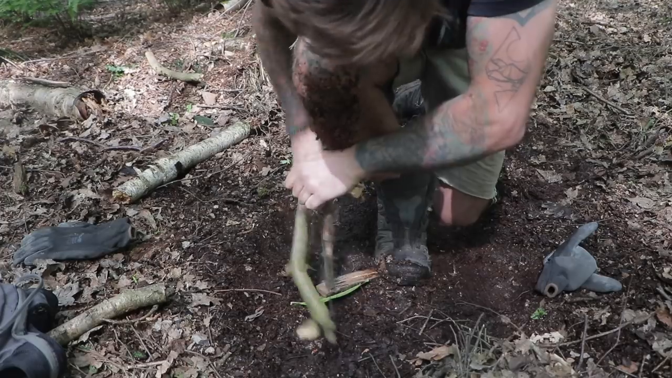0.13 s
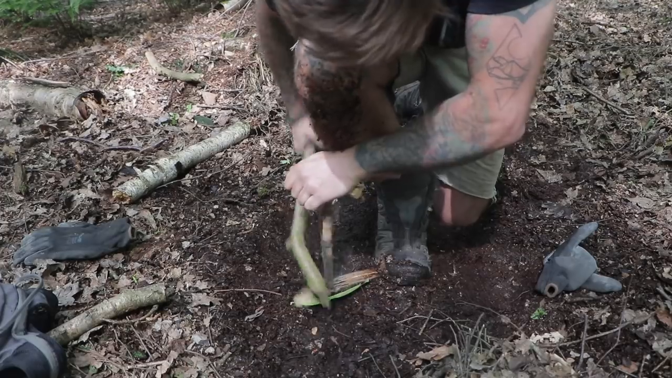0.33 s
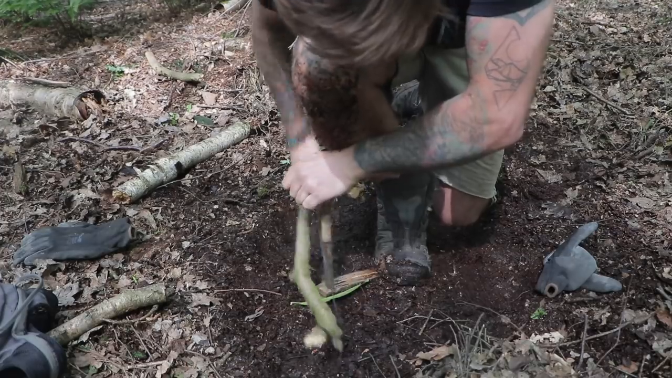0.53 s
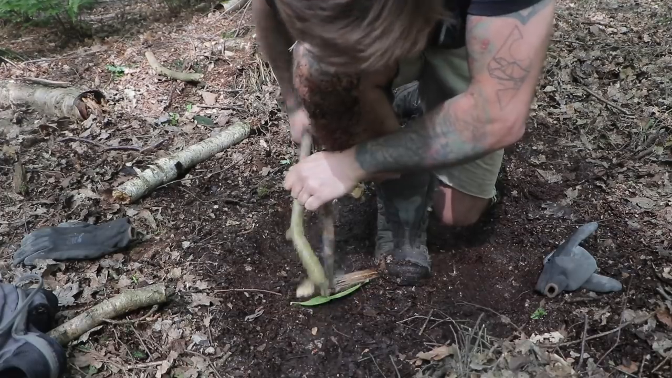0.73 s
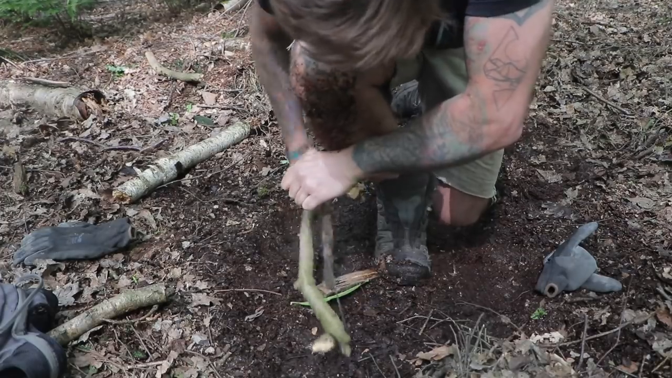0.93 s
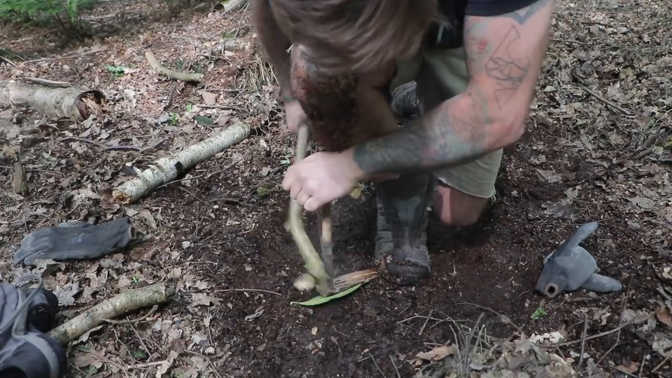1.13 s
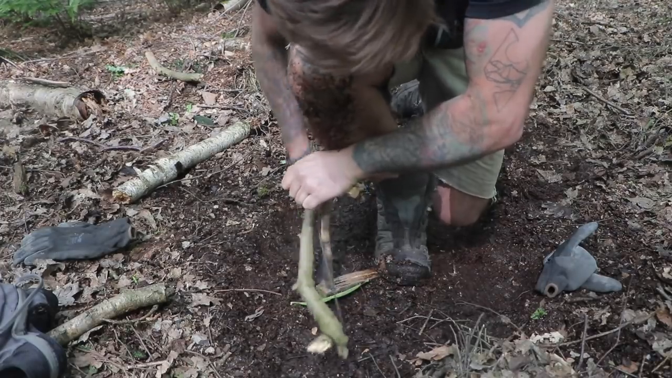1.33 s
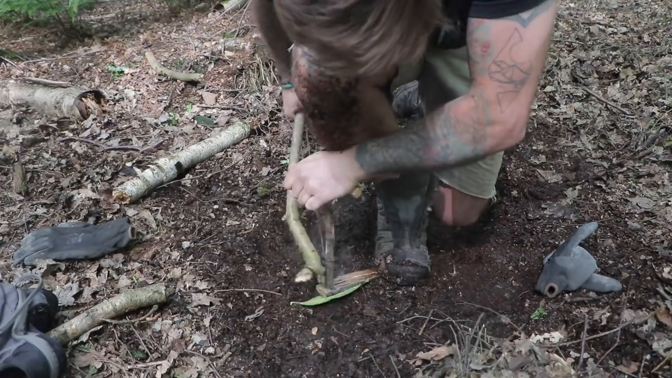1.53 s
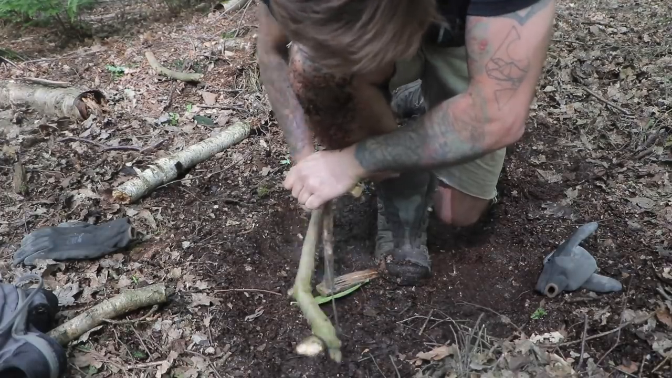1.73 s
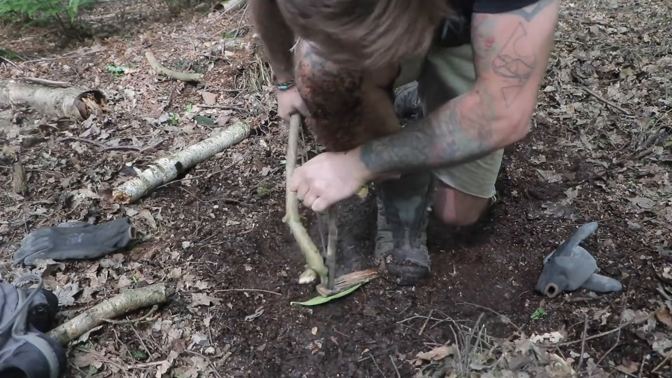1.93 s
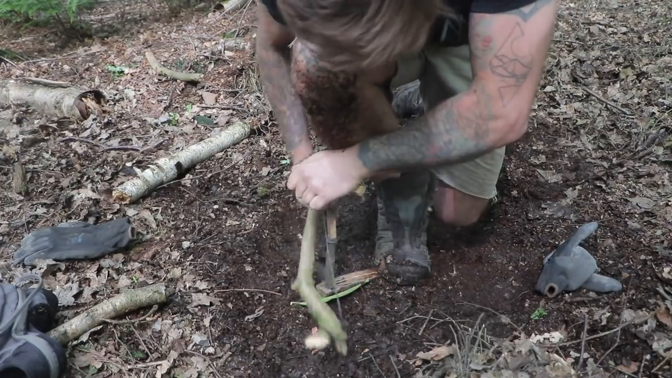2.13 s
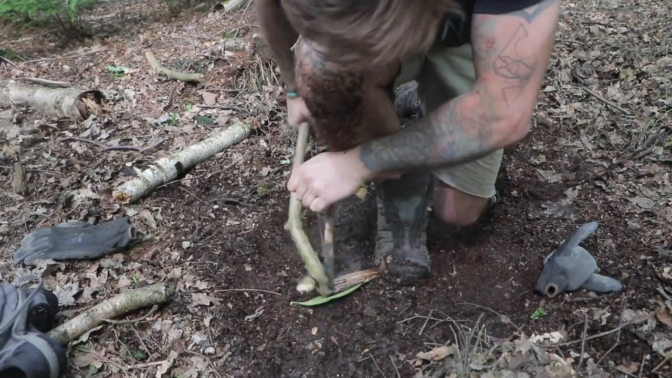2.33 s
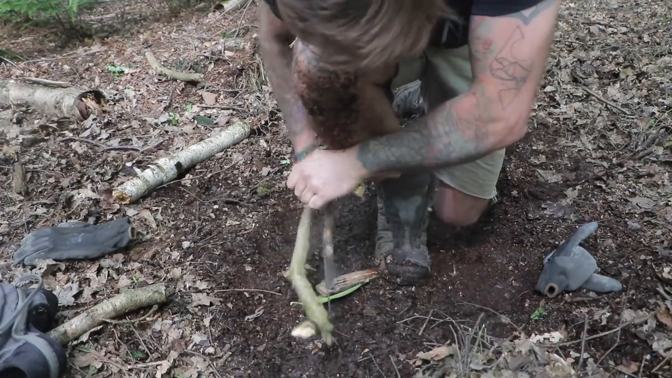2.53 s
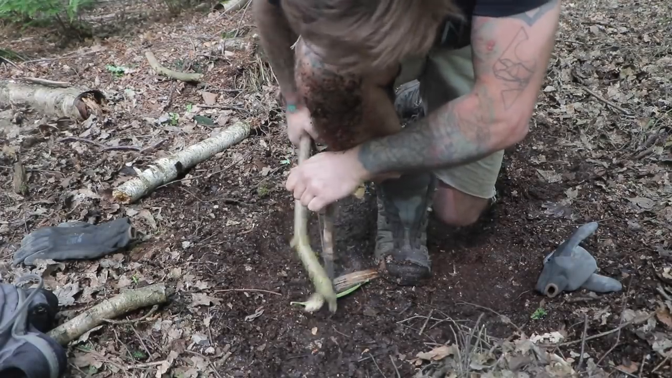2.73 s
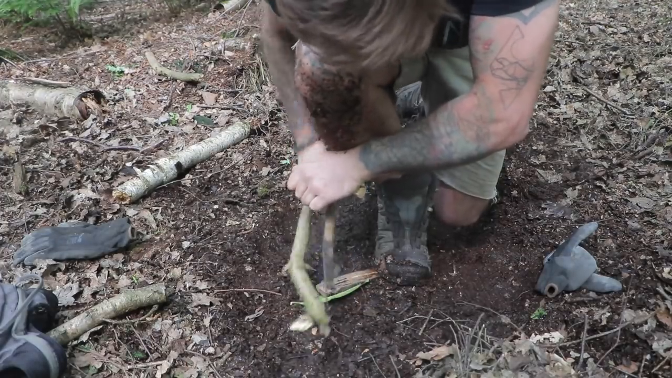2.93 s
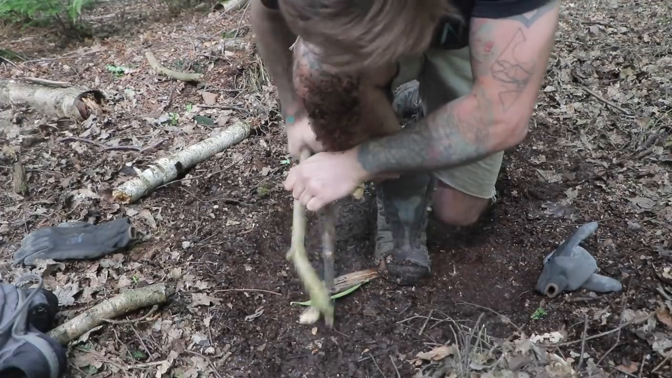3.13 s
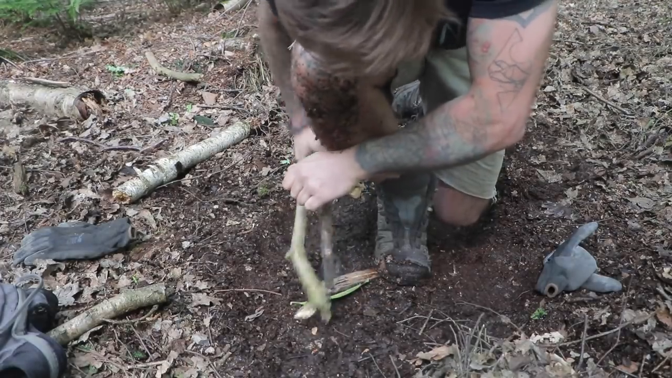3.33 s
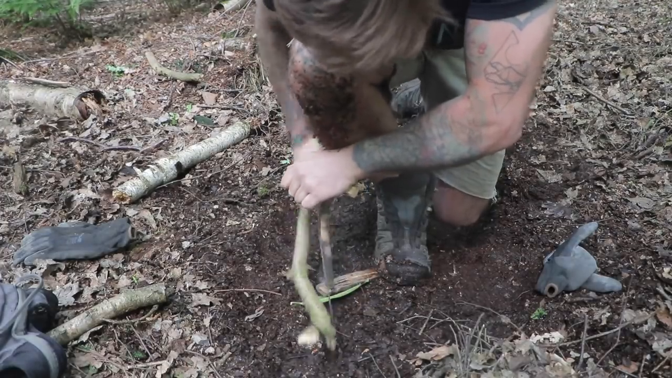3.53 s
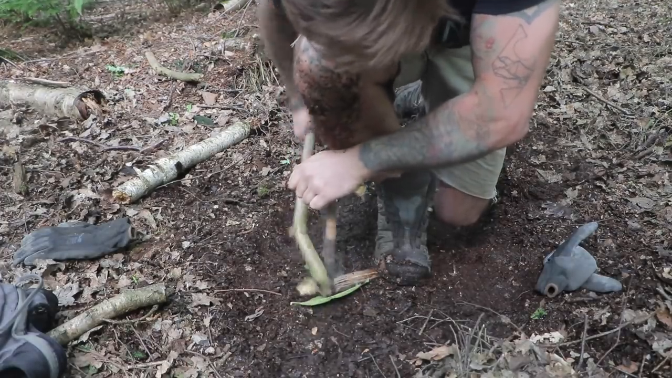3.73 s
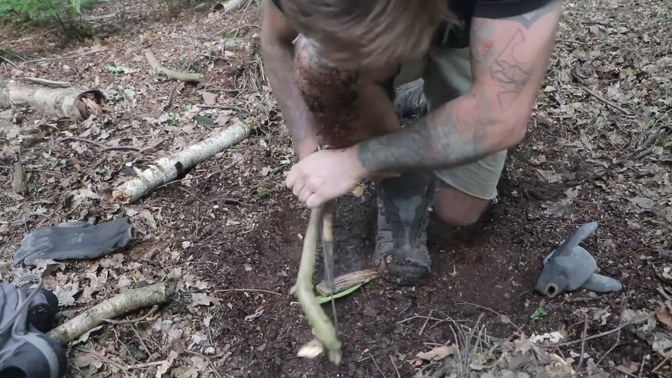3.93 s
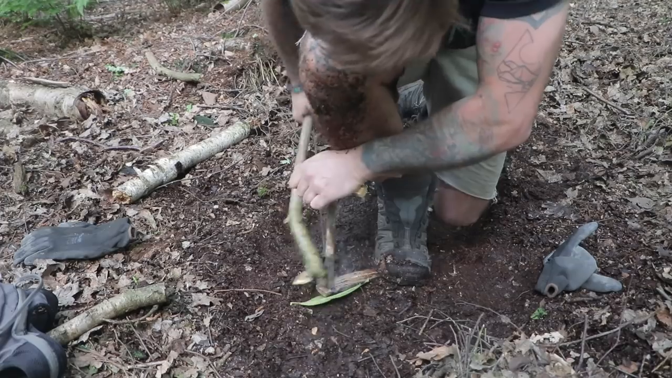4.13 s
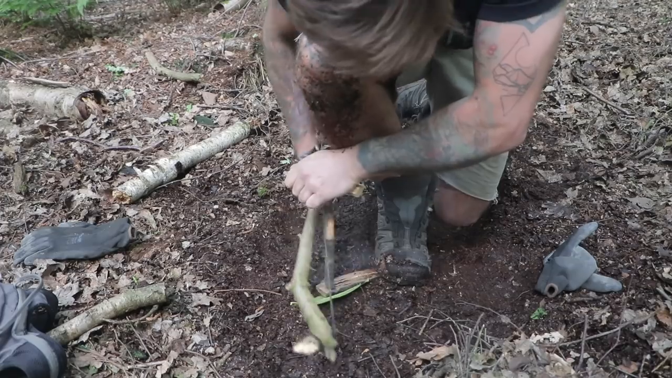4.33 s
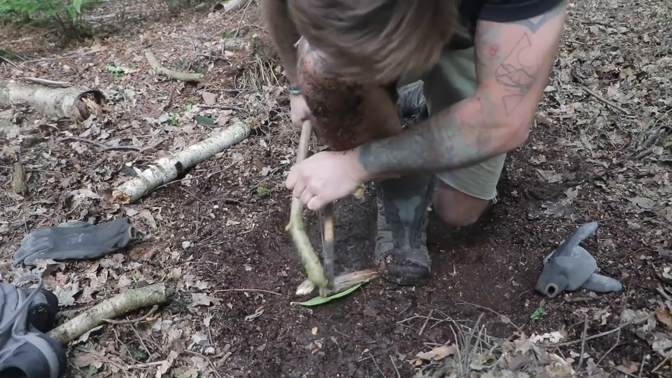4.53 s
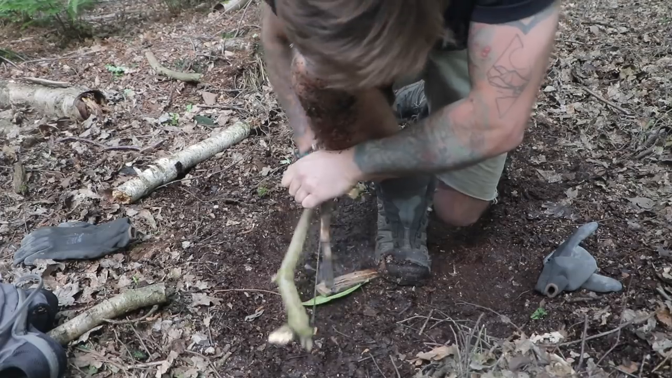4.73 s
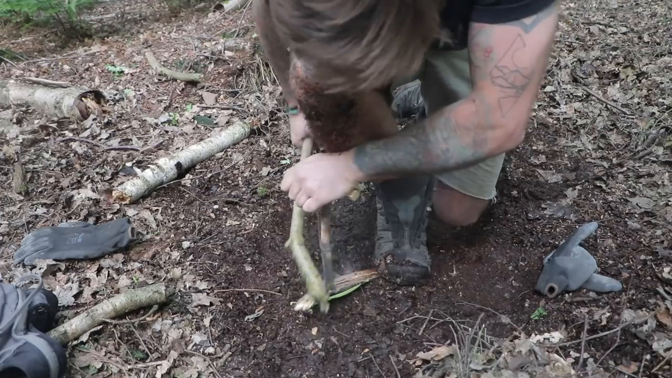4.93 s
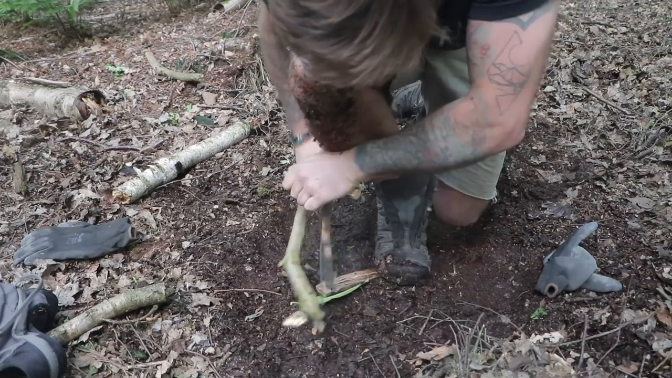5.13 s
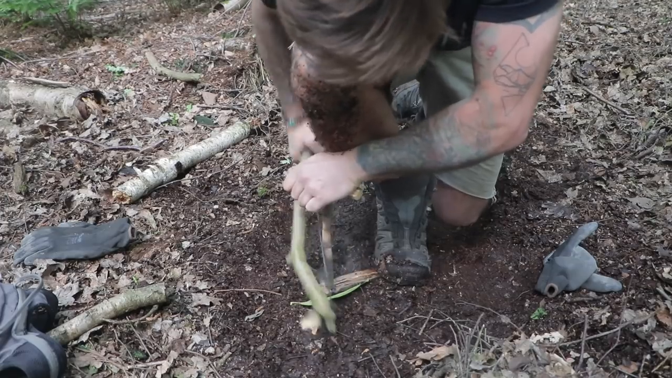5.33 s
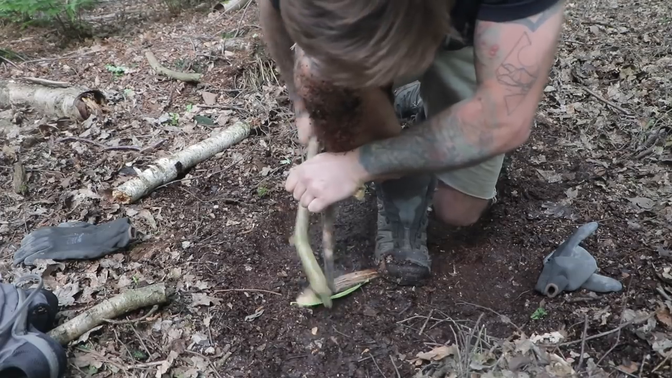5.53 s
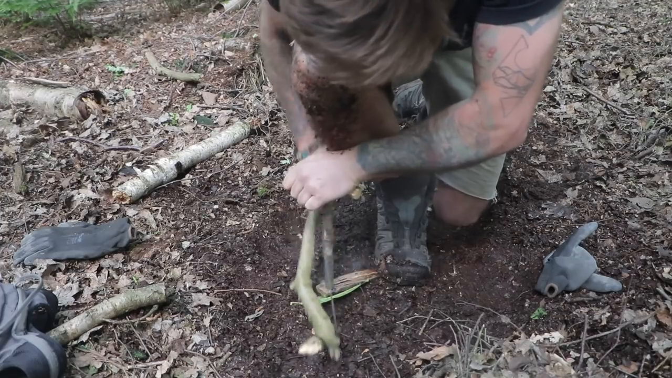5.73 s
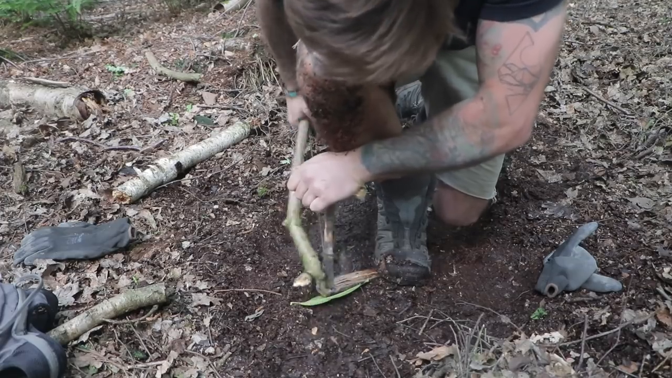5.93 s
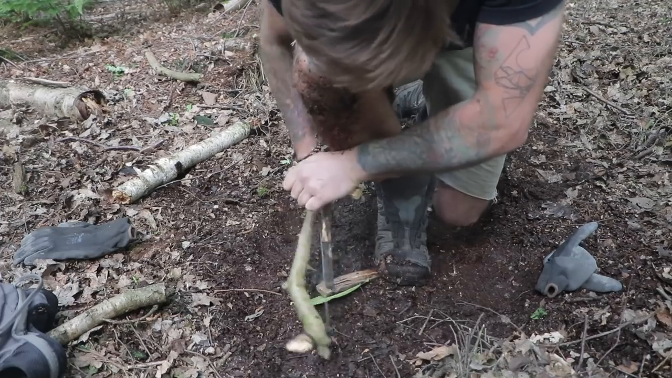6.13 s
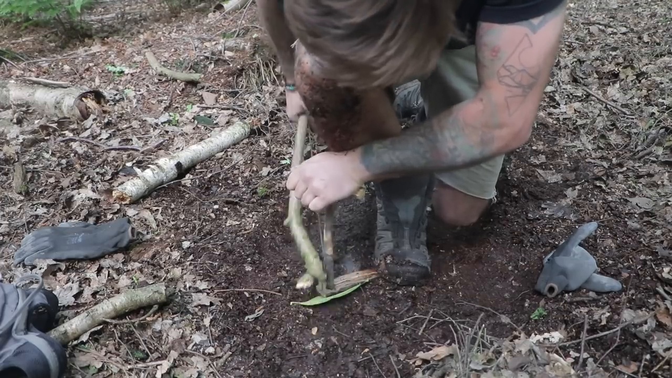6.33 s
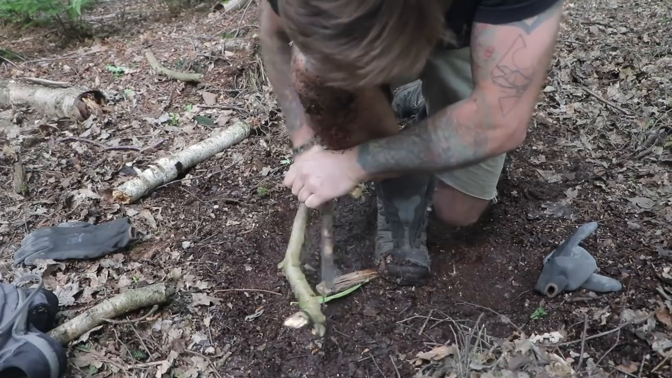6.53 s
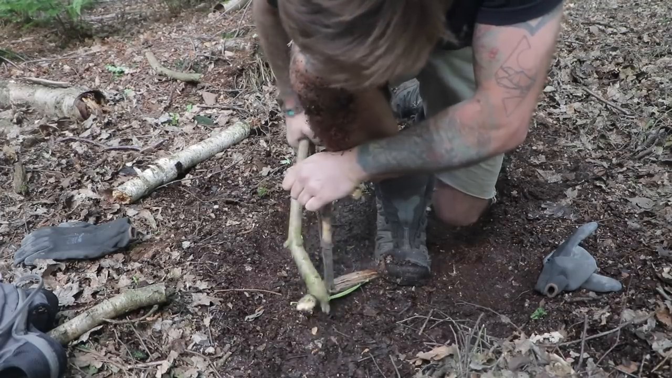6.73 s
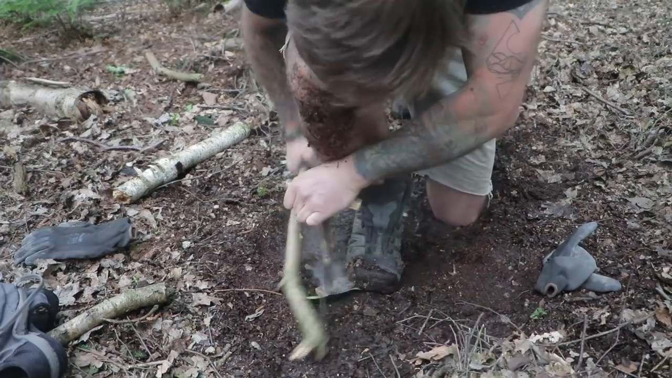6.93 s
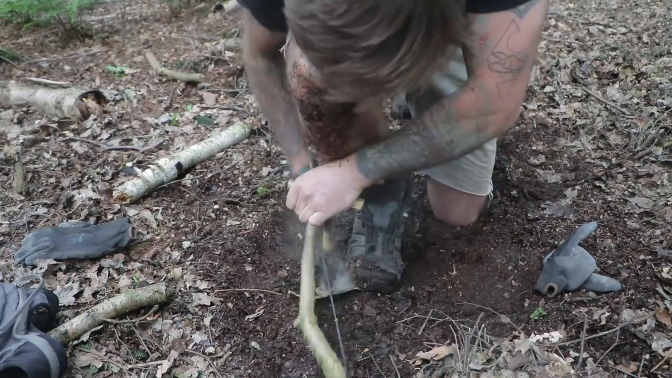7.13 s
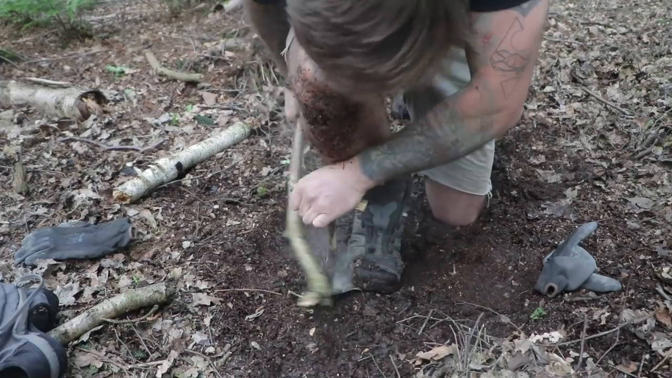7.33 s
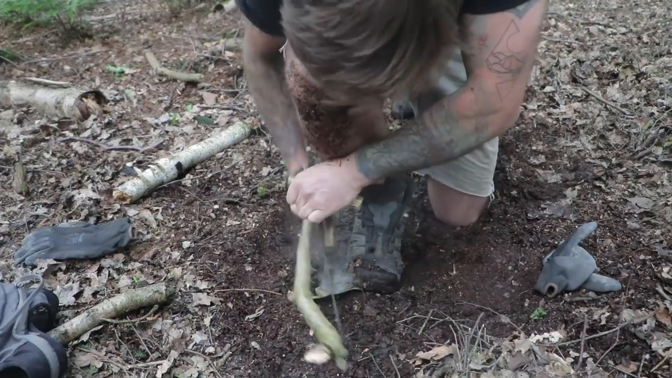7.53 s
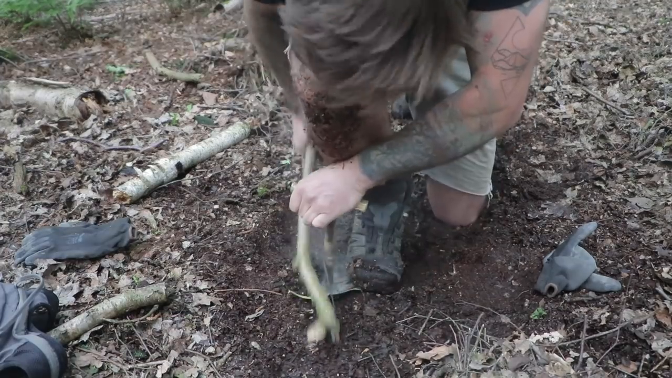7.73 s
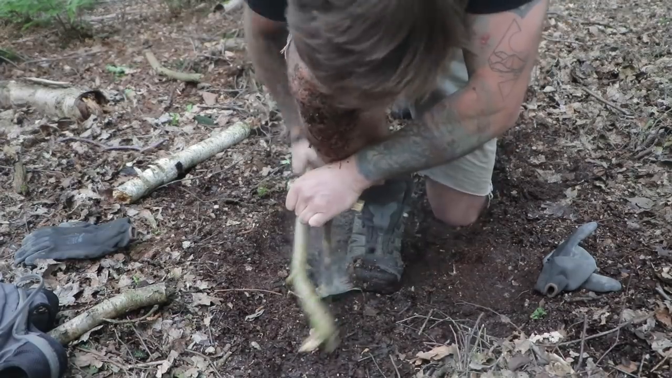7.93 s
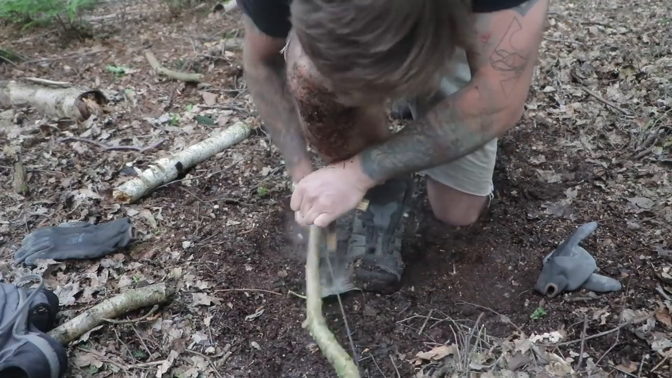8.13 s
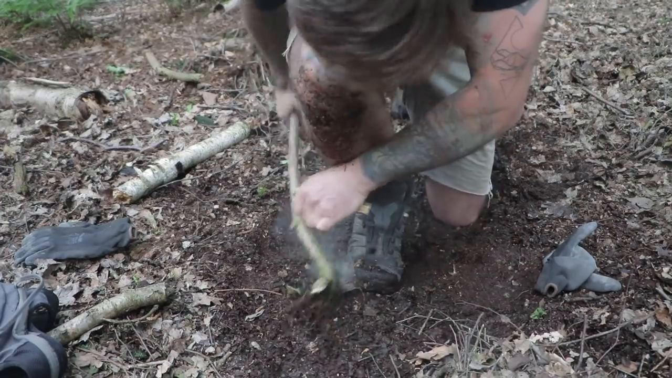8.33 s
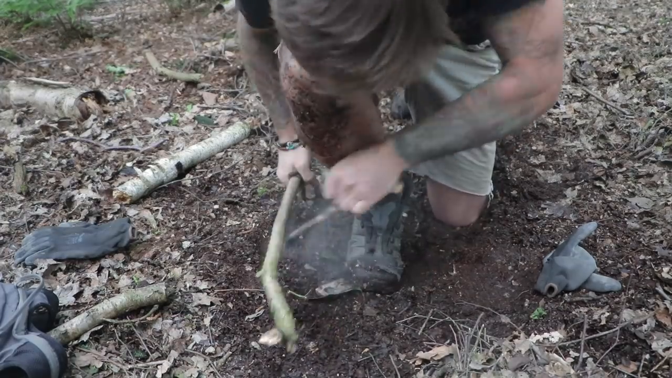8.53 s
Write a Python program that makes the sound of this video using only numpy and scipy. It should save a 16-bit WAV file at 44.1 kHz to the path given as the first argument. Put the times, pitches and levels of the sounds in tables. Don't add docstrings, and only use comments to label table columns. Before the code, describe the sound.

Outdoors in quiet woodland, close to a small microphone, a bow spins a wooden spindle in a board: hissy, fluttering strokes alternate without pause, about five or six a second. Light clicks and small cord chirps punctuate them. Near seven seconds the rubbing turns rougher, with loud knocks, short yelps and groans. After eight seconds the spindle slips out and clatters into leaves. Faint birds whistle behind.

```python
import sys
import numpy as np
from scipy import signal
from scipy.fft import rfft, irfft
from scipy.io import wavfile
from scipy.ndimage import uniform_filter1d

SR = 44100
rng = np.random.default_rng(int(sys.argv[2]) if len(sys.argv) > 2 else 0)


def voltage_ratio(decibels):
    exponent = np.asarray(decibels, float) / 20
    return 10 ** exponent


def generate_wav(signal):
    frames = np.transpose(np.atleast_2d(signal))
    scaled = np.clip(frames, -1, 1) * 32767
    pcm = np.round(scaled).astype(np.int16)
    wavfile.write(sys.argv[1], SR, pcm)


N = 377784
SMOKE_S = 6.88
SMOKING = np.arange(N) > SMOKE_S * SR

# (start [s], bump near mid-stroke [s], rub [dB], bump [dB], limb swing [dB])
PUSHES = [(0.0, 0.048, -45.5, -56, -62), (0.276, 0.376, -45.5, -58, -55), (0.664, 0.763, -47, -55.5, -55.5),
          (1.054, 1.149, -46.5, -60.5, -49.5), (1.428, 1.527, -48, -59.5, -53.5),
          (1.797, 1.896, -47.5, -59, -55), (2.171, 2.27, -47, -61.5, -51.5), (2.549, 2.64, -48, -67.5, -53),
          (2.923, 3.015, -47, -64, -54.5), (3.297, 3.385, -47.5, -61.5, -52.5),
          (3.667, 3.757, -46.5, -57.5, -54), (4.033, 4.13, -47.5, -60.5, -50),
          (4.413, 4.494, -47.5, -60, -51.5), (4.762, 4.855, -49, -64, -59), (5.132, 5.217, -47, -62, -55),
          (5.489, 5.572, -48.5, -58.5, -54.5), (5.845, 5.935, -47.5, -58.5, -50.5),
          (6.198, 6.285, -48.5, -60.5, -54), (6.547, 6.644, -49, -68, -60), (6.898, 6.988, -48, -55, -49.5),
          (7.232, 7.314, -47, -54.5, -50.5), (7.564, 7.656, -48, -52, -52), (7.898, 7.992, -48, -51, -50.5),
          (8.238, 8.296, -59, -75, -53)]


def evened(x):
    return x / np.sqrt(np.mean(x ** 2) + 1e-20)


def add(mix, s, sound):
    part = mix[max(round(s * SR), 0):][:len(sound)]
    part += sound[:len(part)]


def resonate(x, hz, width):
    return signal.lfilter(*signal.iirpeak(hz, hz / width, SR), x)


def resonate_twice(x, hz, width, ratio):
    return resonate(resonate(x, hz, width), hz, ratio * width)


def drift(hz):
    size = int(SR / hz)
    return evened(uniform_filter1d(uniform_filter1d(rng.standard_normal(N), size), size))


def bow(rest, rise, fall, arch, slowing_s=.1):
    # (start [s], bump near mid-stroke [s], rub [dB], bump [dB])
    pulls = [(0.066, 0.174, -48.5, -56), (0.463, 0.561, -47.5, -58.5), (0.85, 0.948, -47.5, -58.5),
             (1.23, 1.329, -47.5, -58.5), (1.598, 1.698, -48, -56.5), (1.982, 2.075, -48.5, -58.5),
             (2.355, 2.452, -48.5, -59), (2.732, 2.82, -47.5, -60.5), (3.1, 3.201, -48.5, -58.5),
             (3.467, 3.567, -48, -58), (3.835, 3.935, -48, -58), (4.21, 4.312, -49, -58.5),
             (4.571, 4.66, -49, -61), (4.934, 5.025, -50, -62.5), (5.295, 5.389, -50.5, -62),
             (5.648, 5.745, -48.5, -56.5), (6.013, 6.106, -50, -58.5), (6.368, 6.46, -48, -57),
             (6.725, 6.822, -52.5, -72), (7.065, 7.143, -49.5, -59), (7.391, 7.475, -47.5, -55.5),
             (7.735, 7.817, -48.5, -55.5), (8.062, 8.139, -49, -59), (8.318, 8.396, -85, -89)]
    # (time [s], push [Hz], pull [Hz])
    spin = [(0, 48.9, 40.3), (2.6, 41.1, 37.4), (3.7, 46.2, 38.5), (5.1, 45.4, 32.4), (5.7, 44.9, 36.2),
            (6.6, 43, 36.7), (7.1, 46.7, 45), (7.4, 46.4, 50.2), (8.1, 43, 50.7)]
    # (push [dB], pull [dB])
    hum_gain = [
        [-17.5, -18],
        [-16.5, -11.5],
    ]
    rows = np.array([row[:4] for pair in zip(PUSHES, pulls) for row in pair])
    t = np.arange(N) / SR
    k = np.clip(np.searchsorted(rows[:, 0], t, "right") - 1, 0, None)
    way = k % 2

    begin = np.r_[rows[1, 0] - .17, rows[1:, 0]][k]
    end = np.r_[rows[1:, 0], N / SR][k]
    along = np.clip((t - begin) / (end - begin), 0, 1)
    start = np.tanh((along / np.take(rise, way)) ** 2)
    stop = np.tanh(((1 - along) / np.take(fall, way)) ** 2)
    speed = rest + (1 - rest) * start * stop * (1 - arch + arch * np.sin(np.pi * along ** 1.156) ** 2)

    s, push_hz, pull_hz = np.transpose(spin)
    spin_hz = np.where(way, np.interp(begin, s, pull_hz), np.interp(begin, s, push_hz))
    turns = spin_hz * slowing_s * np.sin(np.clip((t - rows[k, 1]) / slowing_s, -1.5, 1.5))

    rub_db, bump_db = rows[k, 2], rows[k, 3]
    hum_db = rub_db + np.array(hum_gain)[1 * (begin > SMOKE_S), way]
    levels = [uniform_filter1d(db, size=600) for db in (rub_db, bump_db, hum_db)]
    return k, along, speed, turns, levels


def grit(turns, wobble_db, flicker_db, spread_db, per_s=9000):
    size_db = spread_db * np.minimum(rng.exponential(1, N), 4)
    slips = rng.standard_normal(N) * (rng.random(N) < per_s / SR) * voltage_ratio(size_db)
    lobe = np.exp(1.6 * (np.cos(2 * np.pi * (turns + 0.18 * SMOKING)) - 1))
    press = (2.14 + 1.0 * SMOKING) * lobe + 0.14 * np.sin(2 * np.pi * turns)
    press_db = wobble_db * press + flicker_db * drift(150) + 0.86 * drift(24)
    return evened(slips * voltage_ratio(press_db))


def mottle(x, patchy_db, size):
    z = signal.stft(x, nperseg=256, noverlap=192)[2]
    patches = uniform_filter1d(uniform_filter1d(rng.standard_normal(z.shape), 2, 0), size, 1)
    patched = z * voltage_ratio(patchy_db * evened(patches))
    return evened(signal.istft(patched, nperseg=256, noverlap=192)[1][:N])


def rub(k, speed, turns, rub_db):
    # (centre [Hz], width [Hz], short strokes [dB], long strokes [dB],
    # change once smoking [dB], growth with speed [exponent])
    socket = [(2577, 615, -8.5, -7, 3, 0.84), (3667, 477, -1, -3, 0, 1.08), (3990, 800, -7, -5, 2.5, 0.92),
              (5510, 663, 0, 0, -7, 1.49), (5825, 450, -24.5, -24.5, 25.5, 1.14),
              (5400, 370, -23.5, -35, 23.5, 1.2), (13100, 830, -39.5, -35.5, 19.5, 0.61),
              (7070, 2900, -15, -16.5, 5, 0.67), (8060, 920, 0, 0.5, -1.5, 1.03),
              (10560, 920, -19.5, -22.5, -6, 0.9), (12600, 2000, -12.5, -13, -1, 0.96),
              (15600, 1200, -28, -29, 3, 0.5)]
    drive = grit(turns, wobble_db=1.5, flicker_db=1.2, spread_db=-1.0)
    out = np.zeros(N)
    for n, (hz, width, short_db, long_db, late_db, growth) in enumerate(socket):
        colour_db = np.where(k % 2, long_db, short_db) + late_db * SMOKING
        mode = evened(resonate_twice(drive, hz, width, 2.7))
        out += (-1) ** n * voltage_ratio(colour_db) * speed ** (growth - 1) * mode
    return voltage_ratio(rub_db - 0.5) * speed * mottle(out, patchy_db=3.0, size=8)


def board(speed, turns, hum_db):
    # (centre [Hz], width [Hz], level [dB], change once smoking [dB])
    board_modes = [(520, 265, -4.5, 4.5), (1207, 290, 7, 0.5), (1790, 1900, -3, -17), (2035, 274, 3, -6),
                   (2150, 220, -20, 21), (1340, 200, -20, 22)]
    drive = grit(turns, wobble_db=0.4, flicker_db=1.47, spread_db=1.5, per_s=4000)
    hum = np.zeros(N)
    for n, (hz, width, db, late_db) in enumerate(board_modes):
        swing = voltage_ratio(db + late_db * SMOKING + 2.0 * drift(97))
        hum += (-1) ** n * swing * evened(resonate_twice(drive, hz, width, 1.26))
    return voltage_ratio(hum_db - 1.0) * speed * hum


def air():
    # (frequency [Hz], density [dB per Hz])
    wood_air = [(45, -2), (90, 0), (160, -9.5), (330, -15.5), (750, -14.5), (1100, -18), (2600, -27.5),
                (3000, -23), (4600, -22.5), (15800, -35)]
    # (peak [s], level [dB])
    gusts = [(1.101, -59), (1.4, -53), (1.75, -58), (2.2, -68), (2.9, -71), (3.8, -64), (4.04, -62),
             (4.4, -55), (4.77, -53.5), (5.13, -55), (5.5, -54.5), (5.83, -55.5), (6.19, -52), (6.51, -55),
             (7.12, -59), (7.51, -56), (7.9, -55), (8.35, -53)]
    bins_hz, (f, density_db) = np.fft.rfftfreq(N, 1 / SR), np.transpose(wood_air)
    colour = voltage_ratio(np.interp(np.log(bins_hz + 1), np.log(f), density_db))
    hiss = evened(irfft(rfft(rng.standard_normal(N)) * colour, N))
    leaves = voltage_ratio(-67 + 4.0 + 1.3 * drift(0.94)) * hiss

    rumble = resonate(resonate_twice(rng.standard_normal(N), 30, 11, 16 / 11), 30, 22)
    steady = rumble / np.sqrt(uniform_filter1d(rumble ** 2, 9000) + 1e-12)
    t = np.arange(N) / SR
    power = voltage_ratio(2 * -62) * np.ones(N)
    for s, db in gusts:
        rise_s, fall_s = 0.039, 0.094
        power += voltage_ratio(2 * db) * np.exp(-((t - s) / np.where(t < s, rise_s, fall_s)) ** 2)

    litter = evened(resonate_twice(rng.standard_normal(N), 1300, 2400, 1))
    return litter * voltage_ratio(-70 + 3.0 * drift(60)) * SMOKING + leaves + steady * np.sqrt(power)


def ticks():
    # (time [s], level [dB], centre [Hz])
    tick_rows = [(7.6616, -28, 5170), (0.0005, -43, 280), (8.34, -48, 85), (8.378, -47, 95),
                 (8.44, -51, 90), (6.82, -46, 200), (8.3007, -31, 600), (8.304, -42, 190),
                 (8.486, -53, 3500), (8.361, -45.5, 200), (8.409, -42, 224), (8.326, -37, 8350),
                 (8.3611, -35, 1090), (8.377, -49, 2980), (8.4075, -35, 1100), (8.413, -31, 4500),
                 (8.4576, -26, 1900), (8.507, -47, 2400), (8.531, -37, 5030), (8.548, -35.5, 694)]
    out, impulse = np.zeros(N), np.zeros(4000)
    impulse[0] = -1
    for s, db, hz in tick_rows:
        width = min(hz, 7050)
        tick = resonate(resonate_twice(impulse, hz, width, 2), hz, 2 * width)
        add(out, s, voltage_ratio(db) * tick / abs(tick).max())
    return out


def bumps(k, along, turns, bump_db):
    # (frequency [Hz], level [dB], t60 [s])
    bump_modes = [
        [(125, -9, 0.037), (189, 3.5, 0.027), (285.6, 6.5, 0.024), (600, -3.5, 0.048), (1200, -1, 0.016)],
        [(72, -4.5, 0.096), (121.4, -5, 0.063), (153.6, -5.5, 0.038), (184.7, 0.5, 0.047), (252.6, -4, 0.036),
         (417, 4.5, 0.015)],
        [(104.3, -2, 0.041), (191, 3, 0.03), (281.6, 3, 0.026), (448, 2, 0.03), (600, 0.5, 0.03)],
        [(80.5, -6, 0.05), (141, -4, 0.037), (193, 3, 0.033), (269, 0.5, 0.04), (597, -7.5, 0.048),
         (870, -12, 0.022)],
    ]
    # (time [s], frequency [Hz])
    limb_pitch = [(0, 90.7), (2.4, 85.5), (4.8, 81), (7, 86.7)]
    whole = np.floor(turns + 0.1467)
    new_turn = np.r_[0, (np.diff(whole) > 0) & (np.diff(k) == 0)]
    blow = new_turn * voltage_ratio(bump_db + 1.14 * drift(75))
    t, out = np.arange(SR // 8) / SR, np.zeros(N)
    kind = k % 2 + 2 * SMOKING
    for n, (centre, spread) in enumerate([(0.51, 0.11), (.6, 0.21), (0.54, 0.1), (0.61, 0.21)]):
        ring = sum(voltage_ratio(db - 60 * t / t60) * np.sin(2 * np.pi * hz * t) for hz, db, t60 in bump_modes[n])
        soft_ring = ring * (1 - np.exp(-t / 0.0011)) ** 2
        strength = np.exp(-.5 * ((along - centre) / spread) ** 4) * (kind == n)
        out += signal.oaconvolve(blow * strength, soft_ring)[:N]

    lead_s = 0.0154
    swell = t / 0.048 * np.exp(1 - t / 0.044) * np.cos(4 * np.pi * t)
    for _, s, _, _, db in PUSHES:
        hz = np.interp(s, *np.transpose(limb_pitch))
        add(out, s - lead_s - .02, voltage_ratio(db - 1.0) * swell * np.sin(2 * np.pi * hz * t))
    return voltage_ratio(4.5) * out


def knocks():
    # (time [s], peak [dB], ring [Hz], crack [dB])
    heavy = [(0.377, -51, 1370, -5), (0.587, -52, 1250, 2), (0.763, -36.5, 1170, -15),
             (1.148, -47.5, 1180, 20), (1.511, -40.5, 1260, -8), (1.894, -42, 1180, -11),
             (2.269, -47, 1870, -13), (3.384, -39.5, 3200, 9), (3.737, -36, 1390, 4),
             (3.759, -30.5, 1380, -2), (4.129, -36, 1370, -15), (4.497, -36.5, 1390, -2),
             (5.5671, -30, 1390, 1), (5.932, -32, 1380, -4), (6.284, -32.5, 1400, -27),
             (6.967, -40, 1080, 3), (6.989, -23, 1030, -22), (7.315, -22, 1680, -18),
             (7.633, -40, 2500, -19), (7.6555, -21, 870, -30), (7.663, -25, 1500, -25),
             (7.99, -21.5, 1450, -22)]
    # (time [s], peak [dB], ring [Hz], crack [dB])
    light = [(0.046, -33, 1140, -24), (0.471, -58, 2670, 26), (0.972, -43, 1245, -9), (2.639, -37, 2180, 8),
             (2.988, -40, 3200, 3), (3.516, -50, 1280, 19), (5.2145, -34, 1300, -8), (6.872, -45, 1380, 5),
             (7.293, -39, 970, -5), (7.332, -29.5, 1050, -20), (7.559, -37, 940, 6.5),
             (7.941, -47, 2800, 15), (8.009, -25.5, 960, -21), (8.109, -40, 1310, -9),
             (7.791, -46, 2350, -9), (7.967, -49, 2400, -9), (7.672, -33, 1310, -15),
             (7.695, -47, 1200, -7)]
    thud_level_db = -39.5
    rows = [(*row, thud_level_db + 0.15 * (row[1] - thud_level_db) - row[1]) for row in heavy]
    rows += [(*row, -9.5) for row in light]
    out, t = np.zeros(N), np.arange(2000) / SR
    swell = t / .0011 * np.exp(1 - t / .0011)
    bright = signal.butter(2, [3300, 7500], "bandpass", fs=SR)
    for s, db, hz, crack_db, thud_db in rows:
        noise, late = rng.standard_normal(len(t)), s > SMOKE_S
        t60 = 0.011 * (1250 / hz) ** 0.24 * voltage_ratio(0.14 * (db - thud_level_db))
        rattle = .3 * noise * swell - 6.5 * (np.arange(len(t)) == 50)
        # (Hz, width Hz, dB)
        modes = [(hz, 4.9 / t60, 0), (980 if late else 1250, 500, -6), (1400, 1500, -5),
                 (1850, 600, -5 if late else -16), (3100, 450, crack_db - 0.5)]
        ring = sum(voltage_ratio(share_db) * resonate_twice(rattle, f, width, 0.4) for f, width, share_db in modes)
        thud = -np.sin(2 * np.pi * 520 * t) * voltage_ratio(thud_db - 6.0 - 60 * t / 0.022)
        thud *= 1 - np.exp(-t / 0.00022)
        crack = 0.096 * evened(signal.lfilter(*bright, noise)) * voltage_ratio(crack_db)
        crack *= swell + 0.24 * np.exp(-t / 0.024)
        add(out, s - .0016, voltage_ratio(db) * (ring / abs(ring).max() + thud + crack))
    return out


def birds():
    # (start [s], length [s], start pitch [Hz], end pitch [Hz], level [dB])
    notes = [(2.26, .04, 1960, 1820, -63), (2.29, .085, 1825, 1885, -64), (2.355, .08, 1880, 1895, -65),
             (2.635, .125, 2195, 2172, -58.5), (2.77, .045, 2185, 2170, -66), (1.54, .12, 3065, 3090, -73),
             (1.7, .1, 3075, 3095, -72), (1.82, .11, 3070, 3085, -74), (6.7, .1, 3300, 3500, -72),
             (.05, .15, 5890, 5860, -66), (.75, .04, 7380, 7290, -59), (1.095, .045, 7290, 7150, -59),
             (1.31, .075, 8150, 7950, -55), (.86, .07, 6800, 6900, -70), (1.15, .11, 6940, 6930, -69),
             (.88, .045, 8150, 8080, -62), (4.3, .11, 6250, 6290, -68), (4.395, .05, 6290, 6370, -65),
             (4.44, .07, 6300, 6280, -71), (2.878, .1, 1780, 1750, -63), (2.1, .075, 2310, 2305, -66),
             (3.3, .07, 6230, 6300, -71), (.82, .05, 7330, 7290, -66), (.91, .025, 7400, 7100, -64),
             (.96, .025, 7250, 7000, -64), (1.025, .025, 8500, 8200, -62), (1.075, .03, 8500, 8350, -63),
             (1.395, .05, 8050, 8100, -66)]
    trill_s, shakes_hz, trill_depth = 2.878, 37, .04
    out, waver = np.zeros(N), drift(130)
    for s, length, start_hz, end_hz, db in notes:
        along = np.linspace(0, 1, int(length * SR))
        trill = (s == trill_s) * trill_depth * np.sin(2 * np.pi * shakes_hz * (along * length - .013))
        shake = waver[int(s * SR):][:len(along)]
        pitch = (start_hz + (end_hz - start_hz) * along) * (1 + .003 * shake + trill)
        tone = np.sin(2 * np.pi * np.cumsum(pitch) / SR)
        swell_db = db - 5.5 * abs(2 * along - .8) + 4.5 + 3.5 * shake
        add(out, s, voltage_ratio(swell_db) * tone * signal.windows.tukey(len(along), .5))
    t = np.arange(SR // 4) / SR
    trees = rng.standard_normal(len(t)) * voltage_ratio(-60 * t / .35)
    return out + voltage_ratio(-5) * signal.oaconvolve(out, trees / np.linalg.norm(trees))[:N]


def squeaks():
    # (centre [s], level [dB])
    chirps = [(0.229, -65), (0.622, -62.5), (1.01, -61.5), (1.754, -62), (2.139, -65.5), (2.519, -66.5),
              (2.885, -69), (3.275, -67), (4.001, -71), (5.81, -67), (6.185, -75)]
    # (centre [s], level [dB])
    catches = [(7.118, -60), (7.143, -56), (7.165, -56), (7.182, -50), (7.437, -59), (7.453, -59),
               (7.475, -54), (7.496, -53), (7.514, -53), (7.535, -60), (7.782, -62), (7.798, -58),
               (7.817, -48.5), (7.837, -53), (7.856, -57), (7.872, -62), (8.095, -57), (8.137, -58),
               (8.157, -53), (8.179, -54), (8.197, -57)]
    # (centre [s], length [s], start pitch [Hz], end pitch [Hz], level [dB])
    wood_squeaks = [(3.796, 0.01, 2200, 2080, -52), (7.668, 0.015, 1910, 1640, -37),
                    (8.001, 0.016, 1140, 2300, -41.5), (8.312, 0.006, 13000, 12000, -65),
                    (8.534, 0.0123, 5400, 4800, -61), (2.865, 0.009, 1700, 2050, -70),
                    (8.364, 0.0046, 2790, 2850, -46), (8.361, 0.0026, 4450, 3940, -44),
                    (8.46, 0.0056, 7900, 7500, -48), (8.443, 0.01, 2650, 2550, -60),
                    (8.305, 0.0071, 7600, 7700, -60), (7.505, 0.016, 2180, 2140, -55)]
    rows = [(s, 0.041, 562, 696, db) for s, db in chirps]
    rows += [(s, 0.0092, 1320, 1170, db) for s, db in catches]
    out = np.zeros(N)
    for s, length, start_hz, end_hz, db in rows + list(wood_squeaks):
        count = int(1.39 * length * SR)
        tone = np.sin(2 * np.pi * np.cumsum(np.linspace(start_hz, end_hz, count)) / SR)
        add(out, s - 0.7 * length, voltage_ratio(db + 9.5) * np.hanning(count) * tone)
    return out * voltage_ratio(3.0 * drift(940))


def groans():
    # (start [s], length [s], centre [Hz], level [dB])
    groan_rows = [(6.87, 0.11, 520, -69), (7.009, 0.057, 565, -65), (7.383, 0.04, 450, -68),
                  (7.577, 0.043, 560, -65), (7.702, 0.083, 540, -59), (7.866, 0.05, 470, -69),
                  (8.14, 0.05, 565, -55.5), (8.202, 0.095, 550, -65)]
    out = np.zeros(N)
    for s, length, hz, db in groan_rows:
        count = int(1.5 * length * SR)
        fuzz = evened(resonate_twice(rng.standard_normal(SR // 4), hz, 105, 2))[-count:]
        add(out, s - 0.15 * length, voltage_ratio(db + 2.5) * np.hanning(count) * fuzz)
    return out


def scuffs():
    # (time [s], level [dB], centre [Hz], decay [s])
    scuff_rows = [(8.301, -48, 950, 0.015), (8.31, -58, 11000, 0.0025), (9.7, -44, 9300, 0.0032),
                  (7.557, -56, 11100, 0.003), (8.441, -47, 7300, 0.003), (8.356, -41, 2900, 0.011),
                  (8.3601, -40, 2660, 0.004), (8.36, -39, 7400, 0.0036), (8.377, -44, 1900, 0.008),
                  (8.389, -51, 6400, 0.02), (8.402, -47, 13500, .004), (8.357, -50, 14000, .006),
                  (8.413, -50, 14500, .003), (8.458, -54, 14000, .004), (8.407, -40, 2200, 0.0035),
                  (8.4025, -41, 3000, 0.0033), (8.4117, -34, 4100, 0.0032), (8.395, -47, 1800, 0.0058),
                  (8.437, -49, 2500, .008), (8.4535, -41, 1100, 0.012), (8.4575, -40, 1800, 0.005),
                  (8.458, -46, 6800, 0.004), (8.531, -52, 4100, 0.0045), (8.547, -51, 6400, 0.0048),
                  (8.548, -40, 170, 0.0056)]
    out, t = np.zeros(N), np.arange(4000) / SR
    for s, db, hz, decay in scuff_rows:
        noise = rng.standard_normal(len(t))
        burst = evened(resonate_twice(noise, hz, min(1.5 * hz, 7050), 0.8))
        add(out, s, voltage_ratio(db) * burst * (1 - np.exp(-t / 0.00017)) * np.exp(-t / decay))
    return out


def landing():
    s, hz, db, t60 = (8.458, 1105, -35, .08)  # (time [s], frequency [Hz], level [dB], t60 [s])
    out, t = np.zeros(N), np.arange(4000) / SR
    add(out, s, voltage_ratio(db - 60 * t / t60) * np.sin(2 * np.pi * hz * t))
    return out


def scene():
    k, along, speed, turns, levels = bow(rest=0.042, rise=[.19, .15], fall=[.075, .065], arch=0.7)
    rub_db, bump_db, hum_db = levels
    drill = rub(k, speed, turns, rub_db) + board(speed, turns, hum_db)
    drill += bumps(k, along, turns, bump_db + 11.0)
    hits = ticks() + knocks() + squeaks() + groans() + scuffs() + landing()
    bounce = np.r_[np.zeros(round(.0023 * SR)), hits][:N]
    near = signal.lfilter(*signal.butter(2, 45, "highpass", fs=SR), drill + hits + 0.0083 * bounce)
    return (near + birds() + air())[None]


def top_cut(x):
    return signal.sosfilt(signal.butter(12, 16450, fs=SR, output="sos"), x)


def record(dry):
    low_pass = signal.firwin(1023, 15790, window=("kaiser", 6), fs=SR)
    limited = signal.oaconvolve(dry, low_pass[None], "same")
    return top_cut(limited)


dry = scene()
out = record(dry)
generate_wav(out)
```